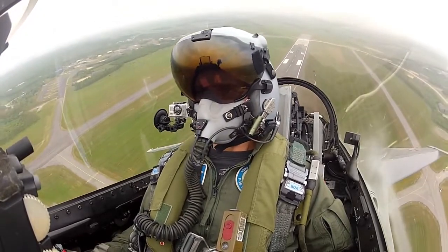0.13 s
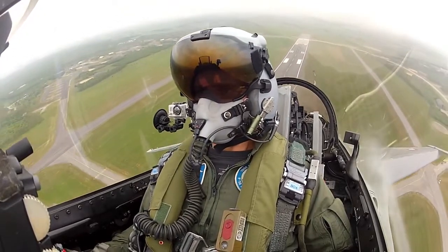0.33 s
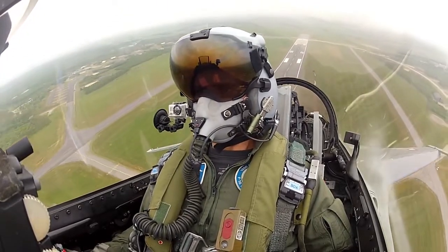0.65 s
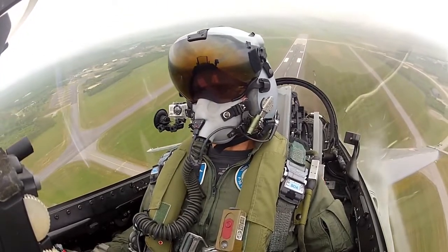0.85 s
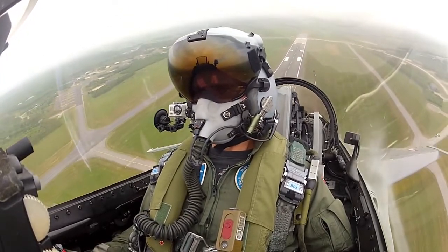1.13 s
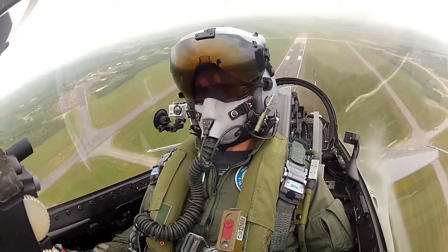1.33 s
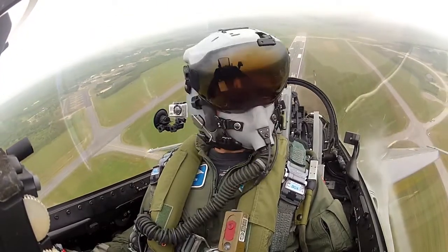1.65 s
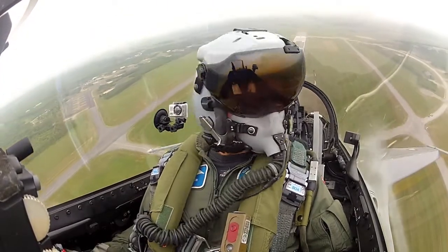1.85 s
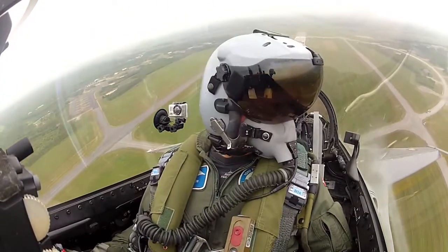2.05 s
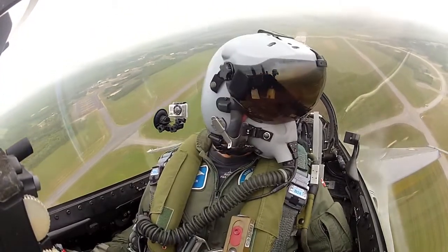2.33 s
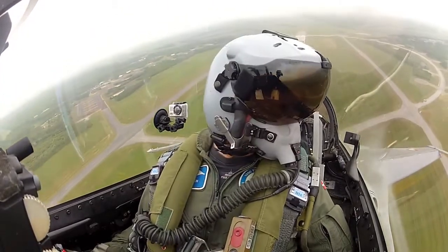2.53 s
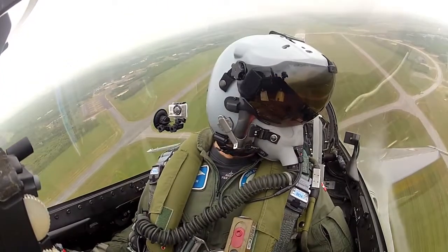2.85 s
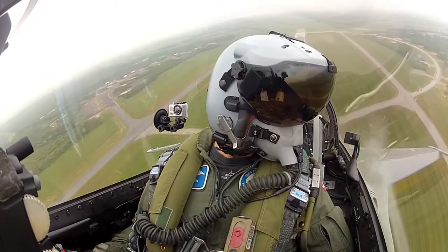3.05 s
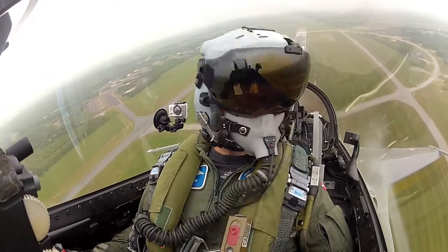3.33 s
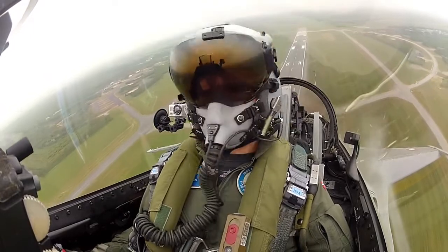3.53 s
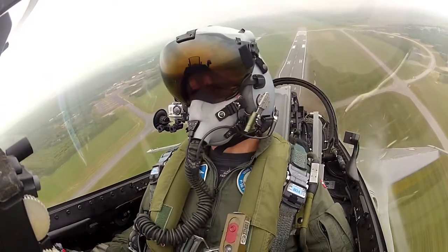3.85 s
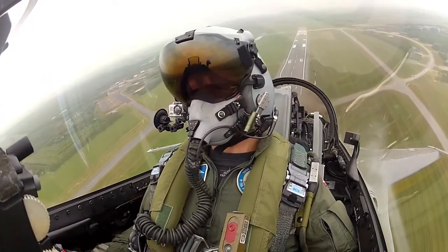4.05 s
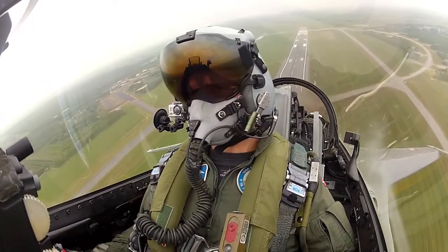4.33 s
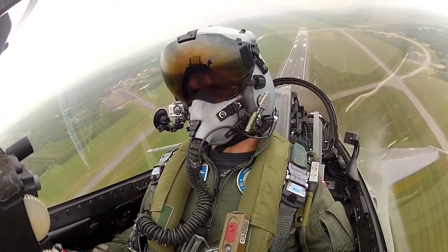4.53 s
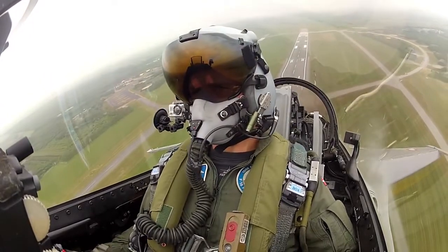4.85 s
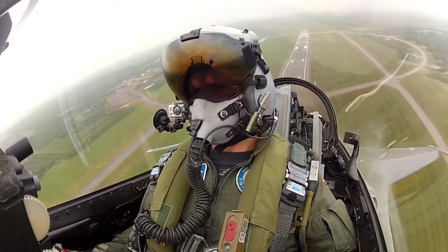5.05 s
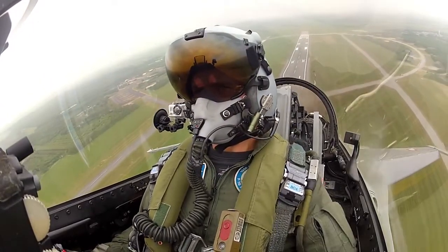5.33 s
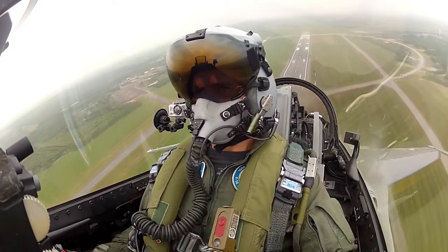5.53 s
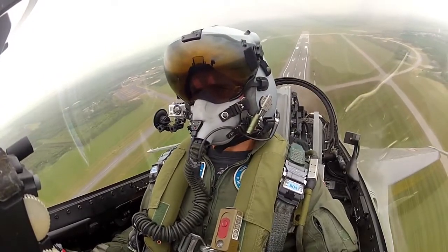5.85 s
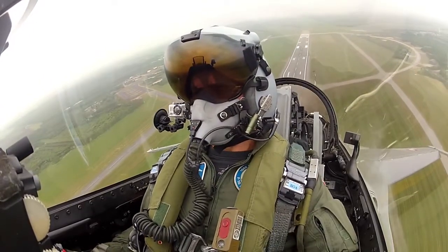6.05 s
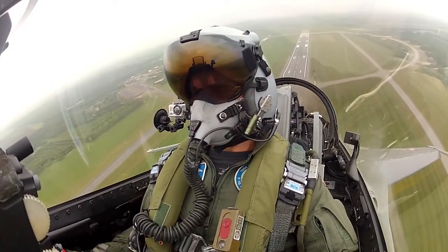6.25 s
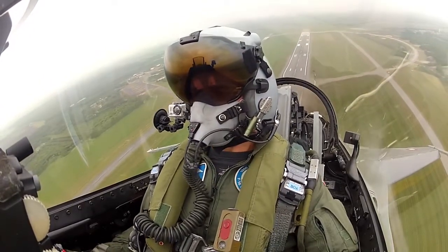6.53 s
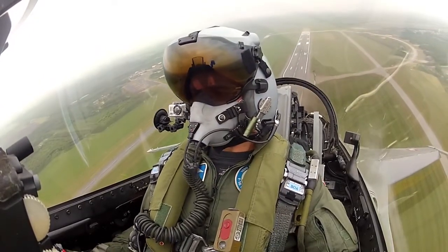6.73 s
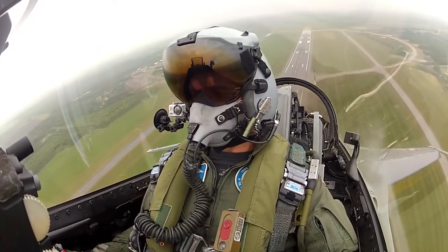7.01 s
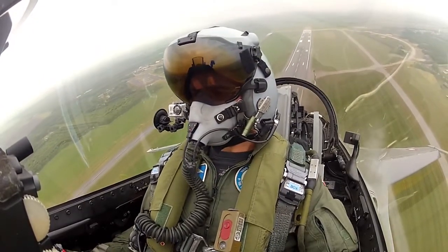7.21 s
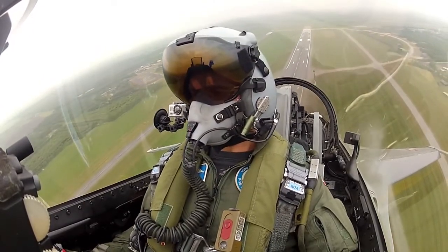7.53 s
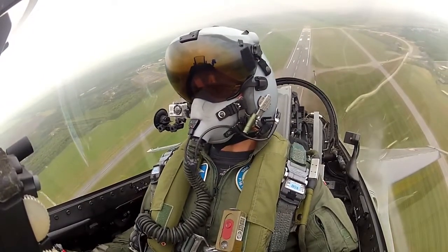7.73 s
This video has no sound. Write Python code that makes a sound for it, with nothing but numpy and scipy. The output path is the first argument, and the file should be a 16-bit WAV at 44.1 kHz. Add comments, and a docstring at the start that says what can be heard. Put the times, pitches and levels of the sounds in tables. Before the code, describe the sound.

Inside a climbing jet's cockpit, engine drone and slipstream roar on, with a fading whine and light, irregular knocking.

```python
"""Engine and slipstream roar in the closed cockpit of a climbing jet.
The noise rings the cabin and the sealed housing of a small camera; the drone surges, the level dips.
Panels hum, an air moan sinks, a shaft whine fades, a loose part knocks and squeaks.
The camera trims loud swells, samples slowly and holds each value: the sound mirrors around that rate."""
import sys
import numpy as np
from scipy import signal
from scipy.fft import rfft, irfft
from scipy.io import wavfile
from scipy.ndimage import uniform_filter1d

SR = 44100
rng = np.random.default_rng(int(sys.argv[2]) if len(sys.argv) > 2 else 0)


def int16_out(signal):
    """Quantize to a 16-bit WAV file."""
    q = np.round(np.clip(np.atleast_2d(signal).T, -1, 1) * 32767)
    wavfile.write(sys.argv[1], SR, q.astype(np.int16))


N = 347508
T = np.arange(N) / SR

# cabin and housing resonances: (frequency [Hz], skirt width [Hz], relative density [dB])
CABIN_MODES = [(59.5, 15.4, -52.5), (41, 18, -63), (94.6, 13.2, -54.5), (157.9, 19.4, -55.5),
               (219.8, 26.6, -54), (284.8, 25.4, -55.5), (336, 33, -57), (459.7, 73.5, -51.5),
               (513, 21.5, -51.5), (571, 41, -50.5), (632.4, 27, -45.5), (672.7, 22.2, -42.5),
               (842, 78, -61), (1184, 76, -69.5), (1370, 13, -74), (1478, 19, -63), (1632, 146, -65.5),
               (1804, 120, -57.5), (1913, 67, -59), (1980, 193, -64)]
HOUSING_MODES = [(2261, 23, -59.5), (2348, 80, -63.5), (2510, 37, -67), (2575, 22, -69.5),
                 (2683, 94, -76.5), (2760, 17, -78.5), (3103, 160, -79.5), (3190, 22, -77.5),
                 (3410, 54, -73.5), (3507, 41, -68.5), (3660, 83, -70), (3786, 43, -67), (3990, 68, -78.5),
                 (4180, 93, -83.5), (4380, 28, -77.5), (4420, 100, -87.5), (4880, 51, -83),
                 (5040, 89, -87.5), (5150, 30, -83.5), (5360, 121, -91), (5490, 41, -92.5),
                 (5700, 31, -104)]
# noise between the resonances: (frequency [Hz], relative density [dB])
NOISE_FLOOR = [(20, -92), (120, -70), (380, -76), (750, -74.5), (1000, -66), (1380, -68), (2150, -89),
               (2900, -85), (3300, -89.5), (4050, -91), (4600, -89.5), (5200, -92), (5990, -100.3)]
# roar bands: buffet, airframe rumble, slipstream hum, cabin drone, canopy rush, housing hiss
# (calm level at start [dB], shaking share [dB/dB], growth with airspeed [dB/s])
ROAR_BANDS = [(-39.5, 0.73, 0.46), (-39, 1, 0.06), (-35, 0.02, 0.83), (-26, -0.0345, -0.06),
              (-35, 0.41, 0.47), (-44.5, 0.7253, 0.4862)]
# borders between the bands: (frequency [Hz])
BAND_EDGES_HZ = [125, 260, 590, 750, 2100]
# airframe shaking: (time [s], level above calm [dB])
AIRFRAME_SHAKING = [(0, 12), (.45, 9), (.9, 12), (1.35, 8), (1.8, 2.5), (2.3, 4.5), (2.7, 8), (3.2, 2),
                    (3.6, 0), (4.5, 2), (5.3, 2.5), (5.8, 3.5), (6.5, 2.5), (7.3, 4), (7.88, 4)]
# sudden level drops: (time [s], depth [dB])
LEVEL_DIPS = [(0.04, 4), (0.422, 6.5), (1.205, 3.5), (1.511, 3.5), (2.647, 4.5), (4.295, 4.5), (4.53, 0.5),
              (4.745, 0.5), (4.973, 3), (5.371, 3), (6.009, 4.5), (6.467, 2.5), (6.663, 4), (6.869, 2.5),
              (7.073, 5.5), (7.389, 6.5)]
# panel hums: (frequency [Hz], width [Hz], relative level [dB])
PANEL_MODES = [(91.3, 9.2, -41), (156.6, 3.05, -36.5), (220.8, 8.5, -42), (337.7, 20, -45)]
# shaft whine, two spells: (time [s], level [dB])
WHINE_ENVELOPE = [(0, -31), (.35, -31), (.46, -34), (.6, -29.5), (1.1, -31.5), (1.7, -52), (1.95, -35),
                  (2.45, -38), (2.9, -59)]
# louder knocks of the loose part: (time [s], peak [dB], pitch [Hz])
LOUD_KNOCKS = [(1.412, -25.5, 1176), (1.51, -22, 1200), (1.663, -22.5, 1201), (1.738, -21.5, 1160),
               (1.808, -23, 1150), (2.854, -25, 1140), (2.89, -28, 1145), (3.033, -25, 1156),
               (3.279, -27, 1120), (3.383, -23.5, 1150), (3.508, -20, 1120), (3.52, -25, 1150),
               (3.756, -21.5, 1174), (3.774, -24, 1127), (3.973, -27, 1138), (4.173, -24, 1180),
               (4.283, -18.9, 1140), (4.321, -20, 1180), (4.364, -19.5, 1113), (4.527, -19.5, 1199),
               (4.751, -22, 1168), (4.86, -25.5, 1080), (4.971, -23, 1195), (5.073, -22, 1171),
               (5.088, -19, 1130), (5.203, -23, 1125), (6.573, -28, 1200), (6.663, -19.5, 1125),
               (6.72, -26, 1190), (6.866, -28, 1120), (6.913, -23, 1120), (7.068, -25, 1219),
               (7.249, -28, 1170)]
# lighter rattling: (start [s], end [s], blow rate [1/s])
RATTLE_SPELLS = [(1.4, 2.3, 10), (2.5, 5.95, 22), (6.35, 7.4, 14)]
# joint squeaks: (time [s], level [dB], pitch [Hz], rise [s], fall [s])
JOINT_SQUEAKS = [(3.823, -55, 4650, .002, 0.0064), (4.499, -26.5, 4660, 0.0011, 0.01),
                 (4.506, -32, 4590, 0.0052, 0.0049), (5.484, -29, 4640, 0.0011, 0.006),
                 (5.502, -43, 4600, .001, .006), (6.543, -27, 4620, 0.011, 0.0031),
                 (7.279, -38, 4650, .002, 0.01)]
# tones of one squeak: (pitch ratio [1], relative level [dB])
SQUEAK_TONES = [(.68, -20), (.89, -22), (1, 2), (1.11, -13), (1.17, -16)]


def gain_of(db):
    """Decibels to an amplitude factor."""
    return 10 ** (np.asarray(db) / 20)


def unit_rms(x):
    """Scales to rms 1."""
    return x / np.sqrt(np.mean(x ** 2) + 1e-20)


def add(mix, start_s, sound):
    """Mixes a short sound in at start_s."""
    part = mix[round(start_s * SR):][:len(sound)]
    part += sound[:len(part)]


def wander(rate_hz):
    """Low-passed noise, rms 1."""
    lowpass = signal.butter(2, rate_hz, fs=SR, output="sos")
    return unit_rms(signal.sosfilt(lowpass, rng.standard_normal(N)))


def narrow_noise(hz, width_hz):
    """Noise in one narrow resonance: a tone of drifting strength and phase, rms 1."""
    phase = 2 * np.pi * np.cumsum(hz * np.ones(N)) / SR
    return wander(width_hz / 2) * np.cos(phase) + wander(width_hz / 2) * np.sin(phase)


def ring(hz, rise_s, fall_s, glide_per_s=0., bluntness=1.):
    """Short tone, soft attack; exponential decay, rounder as bluntness grows."""
    t = np.arange(round(.06 * SR)) / SR
    attack = np.sin(np.pi / 2 * np.minimum(t / rise_s, 1)) ** 2
    decay = np.exp(-(np.maximum(t - rise_s, 0) / fall_s) ** bluntness)
    cycles = hz * t * (1 + glide_per_s * (t - 2 * rise_s))
    return attack * decay * np.sin(2 * np.pi * (cycles + rng.random()))


def steadied(x, span_s=.08, strength=.85):
    """Levels slow swells, keeps quick flutter."""
    slow_power = uniform_filter1d(x ** 2, round(span_s * SR))
    slow_power = uniform_filter1d(slow_power, round(span_s * SR / 2))
    return unit_rms(x / (abs(slow_power) + 1e-20) ** (strength / 2))


def shaking_db():
    """Airframe shaking per sample."""
    return np.interp(T, *np.transpose(AIRFRAME_SHAKING))


def dip_gain(fall_s=.018, recovery_s=.1):
    """The level drops quickly and recovers exponentially."""
    kicks_db = np.zeros(N)
    for time_s, depth_db in LEVEL_DIPS:
        kicks_db[round(time_s * SR)] = depth_db
    drop_db = signal.lfilter([1], [1, -np.exp(-1 / (recovery_s * SR))], kicks_db)
    return gain_of(.5 - uniform_filter1d(drop_db, round(fall_s * SR)))


def joint_squeaks():
    """A rubbed joint rings unevenly on one strong and four weak tones."""
    out = np.zeros(N)
    for time_s, db, hz, rise_s, fall_s in JOINT_SQUEAKS:
        for ratio, tone_db in SQUEAK_TONES:
            add(out, time_s, gain_of(db + tone_db) * ring(hz * ratio, rise_s, fall_s))
    return out * gain_of(3.3 * wander(300))


def loose_part_knocks(rattle_db=-33.5, rattle_hz=1124, faint_count=300):
    """Soft blows ring a damped part: rising pitch, weak overtone. Faint taps fall at random."""
    out, rattle = np.zeros(N), []
    for start_s, end_s, rate_per_s in RATTLE_SPELLS:
        span_s = end_s - start_s
        when, size, pitch = rng.random((round(rate_per_s * span_s), 3)).T
        rattle += zip(start_s + span_s * when, rattle_db + 5.5 * size, rattle_hz + 75 * pitch)
    for peak_s, db, hz in LOUD_KNOCKS + rattle:
        add(out, peak_s - .006, gain_of(db) * ring(hz, .006, .008, glide_per_s=3., bluntness=1.6))
        add(out, peak_s - .004, gain_of(db - 28) * ring(2.4 * hz, .0033, .0028))
    for when, size, pitch in rng.random((faint_count, 3)):
        tap = ring(1090 + 130 * pitch, .0051, .0048, glide_per_s=6.3, bluntness=1.8)
        add(out, 1.3 + 6.3 * when, gain_of(-40.5 + 4.8 * size) * tap)
    return out


def shaft_whine(shaft_hz=826):
    """A sine on the slightly wavering shaft speed."""
    turns = np.cumsum(shaft_hz + 1.46 * wander(5.1)) / SR
    rms_db = np.interp(T, *np.transpose(WHINE_ENVELOPE)) + 1.7 * wander(2.7)
    return np.sqrt(2) * gain_of(rms_db) * np.sin(2 * np.pi * turns)


def air_moan(top_hz=512, sink_hz=58, mid_s=1.9, slide_s=.9, hold_s=2.9, fade_db_per_s=17):
    """An air moan sinks along an S curve during the climb, then fades."""
    hz = top_hz - sink_hz / (1 + np.exp(2 * (mid_s - T) / slide_s))
    level_db = -35 - fade_db_per_s * np.maximum(T - hold_s, 0)
    return gain_of(level_db) * narrow_noise(hz, width_hz=10.8)


def panel_hums(calm_db=-10, shaking_share=1.52, fade_db_per_s=1.2):
    """Shaken airframe panels hum in narrow resonances and slowly fade."""
    hums = sum(gain_of(db) * narrow_noise(hz, width_hz) for hz, width_hz, db in PANEL_MODES)
    return hums * gain_of(calm_db + shaking_share * shaking_db() - fade_db_per_s * T)


def drone_surges():
    """The main cabin resonance swells briefly ahead of each dip."""
    out = np.zeros(N)
    for dip_s, _ in LEVEL_DIPS:
        add(out, dip_s - .021, gain_of(-14) * ring(630 + 50 * rng.random(), .02, .0074))
    return out


def cockpit_roar(throb_hz=30, flicker_hz=15.3, lull_s=2.1, lull_width_s=.35, lull_db=2.5):
    """Engine and slipstream noise rings cabin and housing; six bands follow shaking and airspeed."""
    hz = np.fft.rfftfreq(N, 1 / SR)
    floor_hz, floor_db = np.transpose(NOISE_FLOOR)
    power = gain_of(2 * np.interp(np.log(hz + 1), np.log(floor_hz), floor_db))
    power *= (hz > 15) & (hz < 6000)
    for mode_hz, width_hz, db in CABIN_MODES + HOUSING_MODES:
        power += gain_of(2 * db) / (1 + ((hz - mode_hz) / width_hz) ** 2) ** 3
    spectrum = rfft(rng.standard_normal(N)) * np.sqrt(power)
    lowpasses = [0] + [1 / (1 + (hz / edge_hz) ** 16) for edge_hz in BAND_EDGES_HZ] + [1]
    bands = [unit_rms(irfft(spectrum * (upper - lower), N)) * dip_gain()
             for lower, upper in zip(lowpasses, lowpasses[1:])]
    drone, canopy_rush = 3, 4
    throb = unit_rms(gain_of(2.2 * narrow_noise(throb_hz, width_hz=16)))
    bands[drone] = steadied(bands[drone]) * throb
    bands[canopy_rush] *= gain_of(-lull_db * np.exp(-((T - lull_s) / lull_width_s) ** 2))
    out = np.zeros(N)
    for band, (calm_db, shaking_share, growth_db_per_s) in zip(bands, ROAR_BANDS):
        level_db = calm_db + shaking_share * shaking_db() + growth_db_per_s * T
        out += band * gain_of(level_db + wander(flicker_hz))
    return out


def scene():
    """Roar plus the smaller sources, which dip with it; mono."""
    roar = cockpit_roar()
    tones = panel_hums() + air_moan() + drone_surges() + shaft_whine()
    loose_part = loose_part_knocks() + joint_squeaks()
    return (roar + (tones + loose_part) * dip_gain())[None]


def record(dry, threshold_db=-20.5, release_db_per_s=29.4, hold_hz=12000, step_hz=48000, cutoff_hz=15200):
    """Gain control trims swells; slow sampling mirrors the sound; the hold weights the mirrors."""
    power_db = 10 * np.log10(abs(uniform_filter1d(dry[0] ** 2, 300)) + 1e-12)
    release_db = release_db_per_s * T
    peak_db = np.maximum.accumulate(power_db + release_db) - release_db
    over_db = np.maximum(peak_db - threshold_db, 0)
    trim_db = .47 * signal.lfilter(np.ones(300) / 300, 1, over_db)  # 7 ms attack
    hz = np.fft.rfftfreq(N, 1 / SR)
    sampled = irfft(rfft(dry / gain_of(trim_db)) * (hz < hold_hz / 2), N)
    mirrored = sampled * (1 + 2 * np.cos(2 * np.pi * hold_hz * T))
    held = irfft(rfft(mirrored) * np.sinc(hz / hold_hz) / np.sinc(hz / step_hz), N)
    lowpass = signal.firwin(1023, cutoff_hz, window=("kaiser", 10), fs=SR)
    return signal.oaconvolve(held, lowpass[None], "same")


dry = scene()
out = record(dry)
int16_out(out)
```